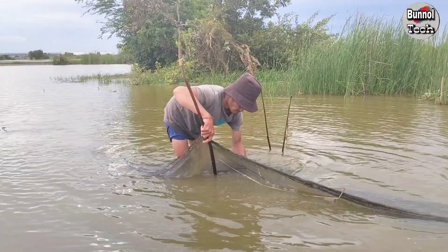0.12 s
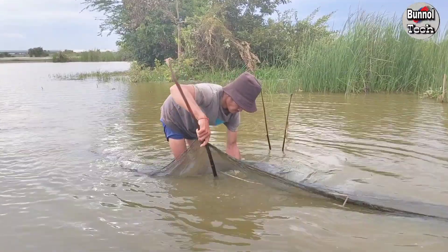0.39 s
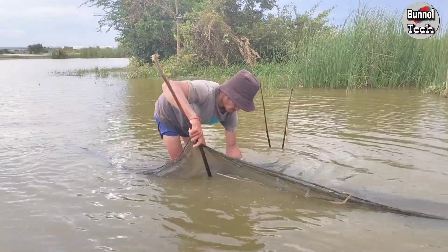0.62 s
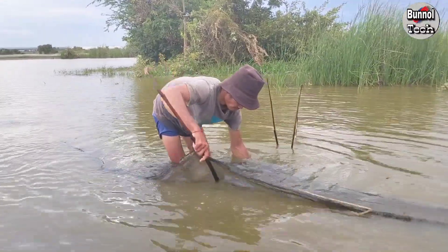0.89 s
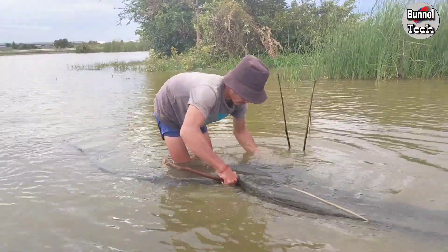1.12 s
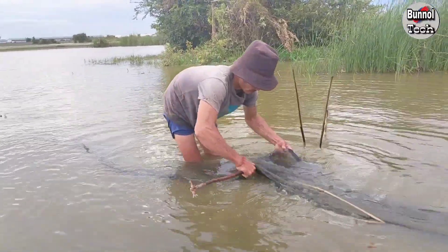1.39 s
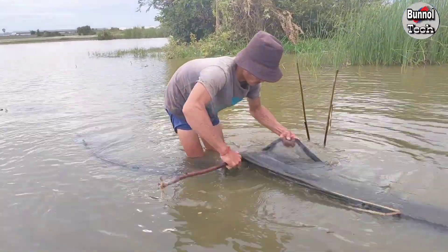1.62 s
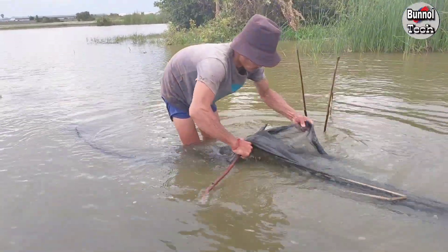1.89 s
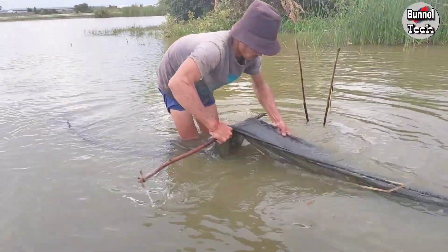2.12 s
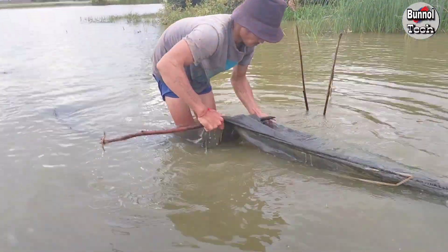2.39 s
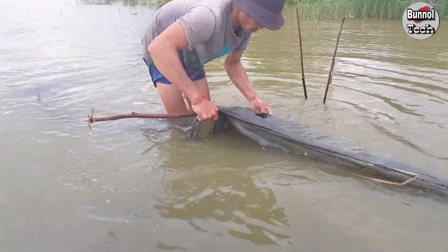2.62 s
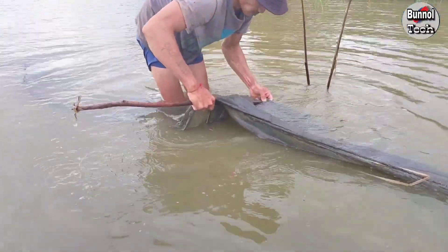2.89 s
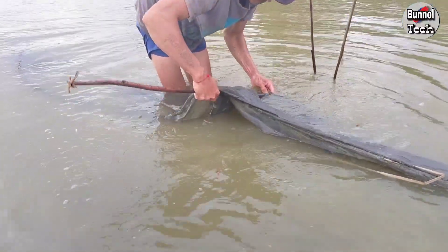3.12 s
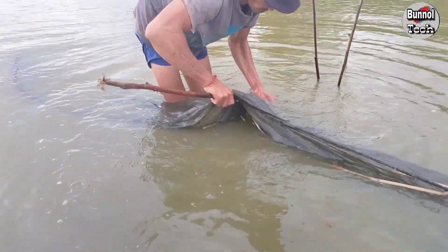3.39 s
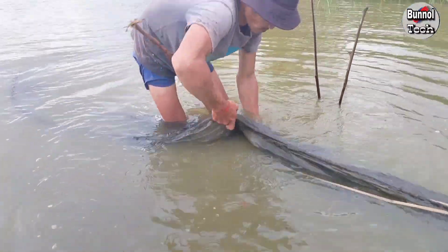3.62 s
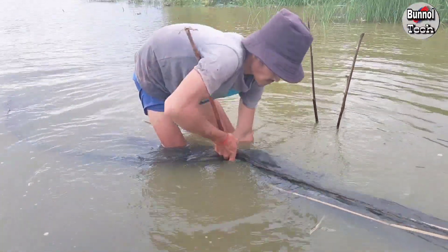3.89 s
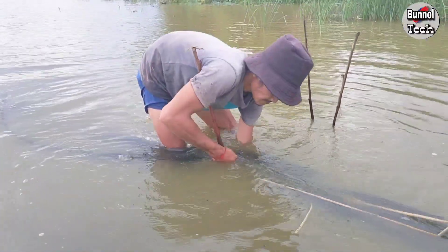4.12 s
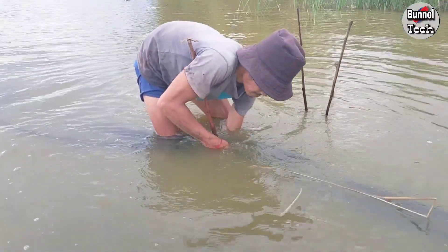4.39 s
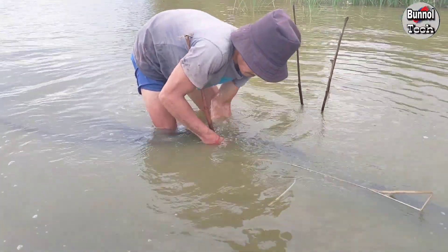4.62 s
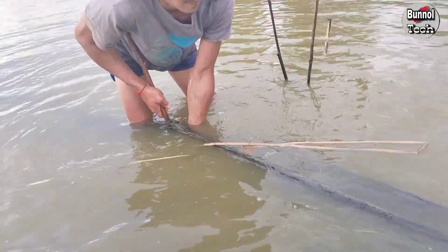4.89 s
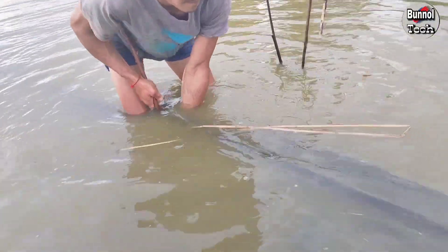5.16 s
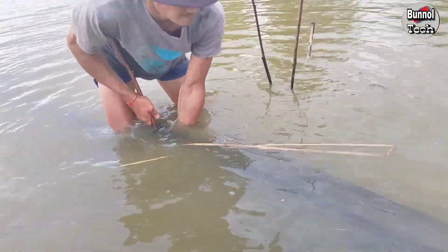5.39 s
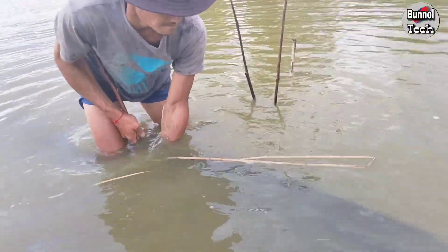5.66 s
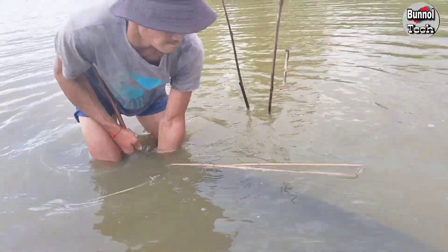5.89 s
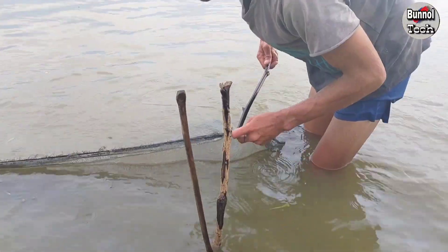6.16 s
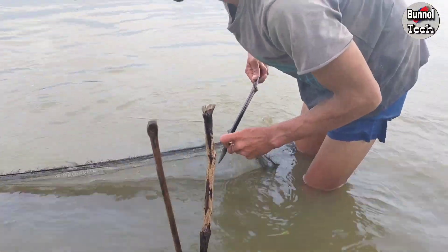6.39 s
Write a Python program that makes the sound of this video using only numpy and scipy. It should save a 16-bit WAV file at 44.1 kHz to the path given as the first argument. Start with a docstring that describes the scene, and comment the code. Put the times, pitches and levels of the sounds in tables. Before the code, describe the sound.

Wet bubbling and splashing at a net, a short scrape on a stake, quieter water, sudden silence, then more plops over rumbling wind.

```python
"""Shallow pond: a person wades and lifts a wet net. Bubbles plop (damped, rising sines), drops tick and spray
fizzes (noise bursts, patchy noise). A cord scrapes a stake and fingers tap the case of a two-port handheld
microphone (struck and rubbed resonances). Wind rumbles and buffets over low hums, far reeds rush and a band of
hiss hangs over the bank (coloured noises). The sound is muted for a third of a second; later a cut, with a
click, changes the stereo balance."""
import sys
import numpy as np
from scipy import signal
from scipy.fft import rfft, irfft, next_fast_len
from scipy.io import wavfile
from scipy.ndimage import uniform_filter1d, map_coordinates

SR = 44100
rng = np.random.default_rng(int(sys.argv[2]) if len(sys.argv) > 2 else 0)


def level_to_linear(level):
    """Convert decibel levels to linear amplitude factors, elementwise."""
    exponent = np.asarray(level, float) / 20
    return 10 ** exponent


def dump_mix(stems):
    """Bounce the given channels to the path in sys.argv[1] as a 16-bit WAV at rate SR."""
    frames = np.atleast_2d(stems).T  # one column per channel
    limited = np.clip(frames, -1, 1)  # hard clip at full scale
    pcm = np.round(limited * 32767).astype(np.int16)
    wavfile.write(sys.argv[1], SR, pcm)


N = 287532

# Hands and net stir the water: (start [s], hold [s], slosh level [dB], trickle level [dB], spray level [dB])
STIRS = [(0, 0.27, -50, -63.5, -66.5), (0.398, 0.053, -49, -61, -71), (.55, 0.44, -60, -80, -74),
         (1.094, 0.13, -48, -63, -72.5), (1.267, 0.42, -46, -59.5, -70.5), (1.803, 0.12, -48, -59, -69),
         (2.037, 0.61, -57.5, -95, -86), (2.906, 0.089, -67, -75, -74), (3.765, 0.041, -68, -73, -76),
         (5.137, 0.13, -48, -59, -76.5), (5.29, 0.15, -59, -58, -72.5), (5.667, 0.025, -79, -59, -78),
         (5.793, 0.13, -68, -65, -85), (6.253, 0.11, -65, -74, -86)]
# Lapping between the stirs: (slosh level [dB], trickle level [dB], spray level [dB])
CALM_DB = (-62, -75, -85.5)
# Pushed water: (frequency [Hz], density [dB per Hz])
WASH_SPECTRUM = [(200, -39), (350, -5), (800, -1), (1250, 1), (2000, -15), (5000, -47)]
# Spray: (frequency [Hz], density [dB per Hz])
SPRAY_SPECTRUM = [(5000, -39.5), (7000, -5.5), (9500, -8.5), (13800, -7), (15800, -11)]
# Bubbles that stand out: (time [s], level [dB], pitch [Hz])
BUBBLES = [(0.0286, -21, 967), (0.096, -32.5, 3500), (0.164, -21.5, 797), (0.327, -26.5, 822),
           (0.401, -22, 990), (0.425, -32, 806), (0.532, -35, 4570), (0.6638, -38, 2210),
           (1.0258, -33, 1670), (1.0901, -30, 2600), (1.091, -29.5, 1960), (1.1409, -33, 1730),
           (1.167, -27, 783), (1.372, -23.5, 920), (1.2818, -27, 950), (1.308, -33.5, 1770),
           (1.3698, -32.5, 2470), (1.397, -35, 2600), (1.492, -37, 3700), (1.558, -34.5, 2600),
           (1.5894, -32, 2210), (1.604, -27.5, 1550), (1.668, -33, 2470), (1.717, -31, 790),
           (1.818, -30, 910), (1.615, -31.5, 720), (1.62, -32.5, 6000), (1.807, -38.5, 4540),
           (1.826, -29.5, 643), (1.85, -30, 1700), (1.8502, -30, 2450), (1.897, -36, 3540),
           (2.013, -28, 790), (3.2055, -41.5, 3820), (3.7923, -41, 1846), (5.118, -34, 3700),
           (5.1209, -31.5, 2640), (5.138, -30.5, 4420), (5.173, -39.5, 2250), (5.1931, -29, 2610),
           (5.192, -34, 1940), (5.216, -29.5, 1480), (5.243, -26.5, 1240), (5.4281, -37.5, 3870),
           (5.695, -33.5, 4570), (5.706, -35, 3550), (5.7523, -39, 1660), (5.801, -45, 2000),
           (5.8087, -36.5, 2700), (5.814, -40.5, 4070), (5.8581, -37.5, 3420), (5.867, -41, 3200),
           (5.889, -43, 4470), (5.931, -36, 2240), (5.9487, -27.5, 2900), (6.123, -45.5, 3740)]
# Drop impacts: (time [s], bright level [dB], dull level [dB])
DROP_IMPACTS = [(0.169, -40, -64), (0.415, -34, -47), (0.5192, -39, -50.5), (0.553, -41, -41),
                (0.5708, -42, -37), (0.602, -39, -57), (0.775, -37, -45.5), (0.8962, -54, -42),
                (1.089, -37, -43), (1.1689, -33, -34.5), (1.284, -56, -51), (1.3705, -55.5, -54),
                (1.491, -54, -41), (1.501, -35, -54), (1.6646, -45, -47.5), (2.274, -37, -70),
                (2.4199, -42.5, -44.5), (3.0589, -47, -60), (3.2934, -43, -48), (3.815, -34.5, -64),
                (5.1028, -44.5, -54), (5.138, -46, -35.5), (5.2111, -35.5, -45.5), (5.2594, -37, -58.5),
                (5.383, -37, -40), (5.5944, -39, -40.5), (5.7064, -60, -44), (5.8402, -49, -53),
                (5.8965, -51, -47), (6.122, -48, -54)]
# Net cord jerks on the stake: (time [s], level [dB])
CORD_SLIPS = [(2.8965, -20), (2.905, -25), (2.912, -25), (2.917, -21), (2.9245, -25.5), (2.988, -21)]
# Net cord slides along the stake: (start [s], hold [s], level [dB])
CORD_SLIDES = [(2.56, 0.17, -53), (2.918, 0.056, -37), (2.993, 0.028, -40)]
# Stake resonances: (frequency [Hz], width [Hz], level [dB])
STAKE_MODES = [(3500, 1600, -10), (4570, 300, 2), (5400, 400, -5), (7030, 2000, -14)]
# Finger taps on the case: (time [s], ring level [dB], push level [dB], left-right difference [dB])
CASE_TAPS = [(0.0378, -24, -16, 20.5), (0.0717, -7, -14, 30), (0.0785, -28, -18, 8)]
# Case resonances: (frequency [Hz], width [Hz], level [dB])
CASE_MODES = [(1197, 910, 15.5), (4490, 5500, -38)]
# Wind strength: (time [s], rumble level [dB], buffet level [dB], rush level [dB])
WIND_LEVELS = [(0.0, -26.5, -36.5, -37.5), (0.43, -30.5, -32, -41.5), (1.4, -29, -46.5, -38.5),
               (3, -30.5, -46, -40), (4.5, -30, -33, -41), (5.28, -32, -48.5, -38.5),
               (5.52, -32.5, -39.5, -40), (5.95, -28.5, -30.5, -40.5), (6.45, -29, -28.5, -41)]
# Wind rumble: (frequency [Hz], density [dB per Hz])
RUMBLE_SPECTRUM = [(13, -45), (22, -4.5), (59, -2.5), (91, -3.5), (113, -1.5), (141, -5), (500, -21),
                   (650, -32.5), (1100, -120)]
# Wind buffet: (frequency [Hz], density [dB per Hz])
BUFFET_SPECTRUM = [(12, -25), (30, 13.5), (100, 5), (250, -5), (600, -41), (1500, -120)]
# Wind rush: (frequency [Hz], density [dB per Hz])
RUSH_SPECTRUM = [(120, -42.5), (200, -7), (376, -11), (822, -16.5), (1370, -27.5), (1900, -33.5),
                 (2470, -70.5), (4180, -120)]
# Low hums, perhaps a distant engine or pump: (frequency [Hz], width [Hz], level re rumble curve [dB])
LOW_HUMS = [(42.5, 27, -10.5), (71.9, 9.5, -7.5), (113.6, 6, -10)]
# Far bank: (time [s], chorus level [dB], reeds level [dB])
BANK_LEVELS = [(0, -54.5, -51), (.45, -51, -58), (.8, -57, -55), (2, -57.5, -55), (4.7, -55, -56.5),
               (5.1, -70, -54.5), (5.9, -63.5, -59.5), (6.5, -60.5, -61)]
# Reeds: (frequency [Hz], density [dB per Hz])
REEDS_SPECTRUM = [(700, -37), (1200, 1), (1800, -10), (2700, -3.5), (3700, -10.5), (4460, -10),
                  (5400, -14.5), (6200, -19.5), (7900, -25.5), (9600, -32.5), (10400, -24), (11400, -31),
                  (15700, -45.5)]
# Hiss band over the bank: (frequency [Hz], density [dB per Hz])
CHORUS_SPECTRUM = [(1200, -120), (1900, -5), (2250, -0.5), (2600, -5), (3300, -120)]
# Likeness of the two ports: (frequency [Hz], correlation [0..1])
PORT_LIKENESS = [(60, 0.93), (300, 0.87), (700, 0.11), (1300, 0.56), (2400, 0.35), (10000, 0.076)]
# Case shading of the left port: (frequency [Hz], left-right difference [dB])
PORT_SHADING = [(60, -2.5), (110, -1), (380, -2), (700, -3), (1290, -4.5), (2380, -10.5), (4400, -7),
                (8120, -1), (15000, -8)]
# Cut: (time [s], share of the shading that stays [ratio], lead of the left channel after it [s])
SCENE_CUT = (5.973, 0.47, -.00034)
# Colour after the cut: (frequency [Hz], gain [dB])
AFTER_CUT_COLOUR = [(1300, -1.5), (1900, 5), (2800, -2), (3900, 5.5), (9000, 3)]
# Sound is on: (from [s], to [s])
SOUND_ON = [(0, 4.7132), (5.0756, 6.53)]


def unit(x):
    """x scaled to rms 1."""
    return x / np.sqrt(np.mean(x ** 2) + 1e-20)


def along(points, hz):
    """(Hz, value) points read on a log frequency axis."""
    f, v = np.transpose(points)
    return np.interp(np.log(hz + 1), np.log(f + 1), v)


def curves(table):
    """One value per sample for each column after the time."""
    s, *columns = np.transpose(table)
    return [np.interp(np.arange(N) / SR, s, c) for c in columns]


def wobble(rate_hz):
    """Smooth random curve, rate_hz knots a second."""
    knots = rng.standard_normal(int(N * rate_hz / SR) + 4)
    return map_coordinates(knots, [np.arange(N) * rate_hz / SR])


def swell(start_s, hold_s, rise_s, fade_db_per_s):
    """Gain that rises up to start_s, holds and dies away."""
    t = np.arange(N) / SR - start_s
    return np.clip(1 + t / rise_s, 0, 1) ** 2 * level_to_linear(-fade_db_per_s * np.maximum(t - hold_s, 0))


def filtered(x, response):
    """x times a complex response of frequency."""
    m = next_fast_len(N + 8192)
    return irfft(rfft(x, m) * response(np.fft.rfftfreq(m, 1 / SR)), m)[..., :N]


def resonances(modes):
    """Causal response of (Hz, width Hz, dB) modes, summed with alternating sign."""
    def response(f):
        total = 0
        for k, (centre, width, db) in enumerate(modes):
            damping = 1j * f * width
            total = total + (-1) ** k * level_to_linear(db) * damping / (centre * centre - f * f + damping)
        return total
    return response


def at_ports(pair):
    """Two unrelated noises mixed to the ports' likeness."""
    turn = lambda hz: np.arccos(np.clip(along(PORT_LIKENESS, hz), 0, 1)) / 2
    mid, side = filtered(pair, lambda hz: np.array([np.cos(turn(hz)), np.sin(turn(hz))]))
    return np.array([mid + side, mid - side])


def noise(spectrum, patchy_db, wide=6, long=8):
    """Pair of coloured noises, rms 1; random gain patches of wide bins by long frames."""
    z = signal.stft(rng.standard_normal((2, N)), nperseg=256)[2]
    field = uniform_filter1d(rng.standard_normal(z.shape[1:]), size=wide, axis=0)
    field = uniform_filter1d(field, size=long, axis=1)
    pair = signal.istft(z * level_to_linear(patchy_db * unit(field)), nperseg=256)[1][:, :N]
    return unit(filtered(pair, lambda hz: level_to_linear(along(spectrum, hz))))


def puffs(s, db, t60_s):
    """White noise bursts with sudden starts, partly different on the two channels."""
    t = np.arange(N) / SR
    power = 0
    for start, level, decay in zip(s, db, t60_s):
        power = power + (t >= start) * level_to_linear(level - 60 * np.maximum(t - start, 0) / decay) ** 2
    common, own = rng.standard_normal(N), rng.standard_normal((2, N))
    return np.sqrt(power) * unit(common + 5.9 * own)


def clicks(s, db):
    """Single-sample impulses."""
    return np.bincount(np.round(s * SR).astype(int), level_to_linear(db), N)


def bubbles(s, db, hz, t60_s, pan_db, rise, attack_cycles, size):
    """Damped sines whose pitch climbs as they ring, summed on two channels."""
    t = np.arange(size) / SR
    age = t / t60_s[:, None]
    phase = 2 * np.pi * hz[:, None] * t * (1 + rise * np.minimum(age, 1) / 2)
    onset = 1 - np.exp(-t * hz[:, None] / attack_cycles)
    ring = level_to_linear(db[:, None] - 60 * age) * onset * np.sin(phase)
    at = (np.round(s * SR)[:, None] + np.arange(size)).astype(int).ravel()
    sides = []
    for sign in (1, -1):
        panned = ring * level_to_linear(sign * pan_db / 2)[:, None]
        sides.append(np.bincount(at, panned.ravel(), N + size)[:N])
    return np.array(sides)


def swarm(hz, spread, cycles, scatter_db, count, size):
    """Random bubbles, rms 1 in all: log-normal pitch, some louder than the rest."""
    u, z = rng.random((count, 2)), rng.standard_normal((count, 2))
    pitch_hz = np.clip(hz * np.exp(spread * z[:, 0]), 300, SR / 2.8)
    loud_db = -scatter_db * np.log(1.02 - u[:, 1])
    return unit(bubbles(u[:, 0] * N / SR, loud_db, pitch_hz, cycles / pitch_hz, 6 * z[:, 1],
                        rise=0.3, attack_cycles=0.4, size=size))


def stirred_water():
    """Each stir swells wash, bubble swarms and spray over the calm lapping."""
    rise_s, settle_db_per_s = 0.036, 131
    busy = level_to_linear(CALM_DB)[:, None]
    for start_s, hold_s, *db in STIRS:
        busy = busy + level_to_linear(db)[:, None] * swell(start_s, hold_s, rise_s, settle_db_per_s)
    slosh_gain, trickle_gain, spray_gain = busy
    wash = level_to_linear(-6.5) * at_ports(noise(WASH_SPECTRUM, patchy_db=1.5))
    gurgle = level_to_linear(-1.0) * swarm(1046, spread=.45, cycles=11.5, scatter_db=6.5, count=3500, size=900)
    slosh = level_to_linear(-5.0) * swarm(1700, spread=.36, cycles=26, scatter_db=1.5, count=4000, size=600)
    trickle = swarm(3840, spread=0.25, cycles=22, scatter_db=5.0, count=5500, size=350)
    ticks = level_to_linear(2.5) * swarm(12500, spread=0.14, cycles=9.5, scatter_db=6.0, count=3000, size=80)
    fizz = level_to_linear(4) * noise(SPRAY_SPECTRUM, patchy_db=5.5, wide=30, long=2)  # short wide sputters
    spray = (ticks + at_ports(fizz)) * level_to_linear([[-2.5], [1.5]])  # the net drips on the right
    return slosh_gain * (wash + gurgle + slosh) + trickle_gain * trickle + spray_gain * spray


def single_bubbles():
    """Bubbles ring, small ones dying sooner; each opens with the plunk of the drop that traps it."""
    s, db, hz = np.transpose(BUBBLES)
    t60_s = 0.036 * (1000 / hz) ** 1.16 + .002
    rings = bubbles(s, db, hz, t60_s, 0 * s, rise=0.075, attack_cycles=0.35, size=2000)
    plunks = bubbles(s, db - 5, 1.4 * hz, 7 / hz, 0 * s, rise=0, attack_cycles=0.27, size=400)
    return rings + plunks


def drop_impacts():
    """Impacts spatter as noise bursts in a bright and a dull band; the dull one starts with a snap."""
    s, bright_db, dull_db = np.transpose(DROP_IMPACTS)
    bright_band = resonances([(10500, 3000, -4), (13500, 4000, 0)])
    dull_band = resonances([(5200, 6500, 0)])
    bright = puffs(s, bright_db, 0.0082 + 0 * s)
    dull = puffs(s, dull_db, 0.02 + 0 * s) + clicks(s, dull_db + 6.5)
    return filtered(bright, lambda f: bright_band(f) ** 2) + filtered(dull, lambda f: dull_band(f) ** 2)


def net_scrape():
    """Sharp slips and a grainy slide ring the thin stake; the slips also click in the treble."""
    slip_t60_s, snap_db, treble_db = 0.016, 9.5, -28.5  # snap: the first jolt over its rattle
    slide_rise_s, slide_fade_db_per_s = 0.0041, 700
    s, db = np.transpose(CORD_SLIPS)
    slips = puffs(s, db, slip_t60_s + 0 * s) + level_to_linear(snap_db) * clicks(s, db)
    slide = 0
    for start_s, hold_s, level_db in CORD_SLIDES:
        slide = slide + level_to_linear(level_db) * swell(start_s, hold_s, slide_rise_s, slide_fade_db_per_s)
    rub = slide * level_to_linear(2.5 * wobble(250)) * rng.standard_normal((2, N))
    treble = filtered(slips, resonances([(13000, 5000, 0)]))
    return filtered(slips + rub, resonances(STAKE_MODES)) + level_to_linear(treble_db) * treble


def case_taps():
    """Taps close to the left port: the case rings and the finger pushes air."""
    push_s, contact_delay_s = .0004, 0.00041
    t = np.arange(SR // 10) / SR
    blows = np.zeros((2, 2, N))  # (ring or push, channel, time)
    for s, ring_db, push_db, pan_db in CASE_TAPS:
        blows[:, :, round(s * SR)] = level_to_linear(np.array([[ring_db], [push_db]]) - pan_db * np.array([0, 1]))
    # a fingertip-wide contact dulls the top
    contact = lambda hz: np.exp(-(hz / 6000) ** 2 - 2j * np.pi * hz * contact_delay_s)
    case = resonances(CASE_MODES)
    ring = filtered(np.arange(N) == 0, lambda hz: case(hz) ** 2 * contact(hz))[:len(t)]
    push = -np.exp(-(t / push_s - 2) ** 2 * 2)
    shapes = np.array([ring / np.abs(ring).max(), push])
    return signal.fftconvolve(blows, shapes[:, None], axes=2)[..., :N].sum(0)


def cut_click():
    """One-sided decaying pulse at the cut, alike on both channels."""
    level_db, decay_s = -26, .0006
    since = np.arange(N) / SR - SCENE_CUT[0]
    return level_to_linear(level_db) * (since >= 0) * np.exp(-np.maximum(since, 0) / decay_s)


def wind():
    """Lumpy low rumble, buffeting mostly on the left port, and a mid rush."""
    rumble_db, buffet_db, rush_db = curves(WIND_LEVELS)
    lumps = level_to_linear(1.04 * wobble(10) + 1.1 * wobble(28))
    rumble = level_to_linear(rumble_db - 1.5) * unit(lumps * at_ports(noise(RUMBLE_SPECTRUM, patchy_db=0.44)))
    buffet = level_to_linear(buffet_db + 2.7 * wobble(11)) * noise(BUFFET_SPECTRUM, patchy_db=2.5) * level_to_linear([[0], [-7]])
    rush = level_to_linear(rush_db + 0.44 * wobble(8.6)) * at_ports(noise(RUSH_SPECTRUM, patchy_db=1.0))
    return rumble + buffet + rush


def low_hums():
    """Low hums under the rumble, perhaps a distant engine or pump: narrow noise bands on its level curve."""
    rumble_db = curves(WIND_LEVELS)[0]
    hums = 0
    for hz, width_hz, db in LOW_HUMS:
        peak = resonances([(hz, width_hz, 0)])
        hums = hums + level_to_linear(db) * unit(filtered(rng.standard_normal(N), lambda f: peak(f) ** 2))
    return level_to_linear(rumble_db) * hums


def far_reeds():
    """Wind in far reeds: patchy broadband hiss."""
    return level_to_linear(curves(BANK_LEVELS)[1]) * at_ports(noise(REEDS_SPECTRUM, patchy_db=2.5))


def far_chorus():
    """Wavering noise band near 2.3 kHz, like insects far along the bank."""
    level_db = curves(BANK_LEVELS)[0] + 0.65 * wobble(50) + 1.0 * wobble(9.0)
    return level_to_linear(level_db) * at_ports(noise(CHORUS_SPECTRUM, patchy_db=1.5))


def shaded(pair):
    """The case shades the left port, which leads above the bass; after the cut shading is weaker, lead reversed."""
    cut_s, share_after_cut, lead_after_cut_s = SCENE_CUT
    first_lead_s = 0.0004815
    side = np.array([[.5], [-.5]])

    def balanced(share, lead_s):
        def response(hz):
            above_bass = hz ** 2 / (hz ** 2 + 450 ** 2)
            lead = np.exp(2j * np.pi * hz * lead_s * side * above_bass)
            return level_to_linear(share * along(PORT_SHADING, hz) * side) * lead
        return filtered(pair, response)

    before = balanced(1, first_lead_s)
    after = balanced(share_after_cut, lead_after_cut_s)
    after = filtered(after, lambda hz: level_to_linear(along(AFTER_CUT_COLOUR, hz)))
    return np.where(np.arange(N) < cut_s * SR, before, after)


def scene():
    """Airborne sound passes the shading of the case; taps and the cut click are added unshaded."""
    water = stirred_water() + single_bubbles() + drop_impacts()
    background = wind() + low_hums() + far_reeds() + far_chorus()
    return shaded(water + net_scrape() + background) + case_taps() + cut_click()


def low_pass(x):
    """Removes everything above the highest recorded frequency."""
    return signal.sosfilt(signal.butter(12, 15840, fs=SR, output="sos"), x)


def record(dry):
    """Band limit, then hard cuts around the mute."""
    top_hz = 15850
    t = np.arange(N) / SR
    on = sum((t >= start) & (t < end) for start, end in SOUND_ON)
    mix = filtered(dry, lambda hz: hz < top_hz) * on
    return low_pass(mix)


dry = scene()
out = record(dry)
dump_mix(out)
```